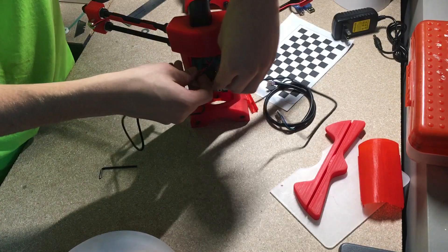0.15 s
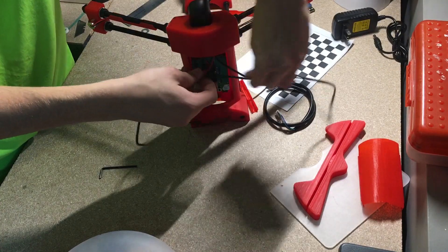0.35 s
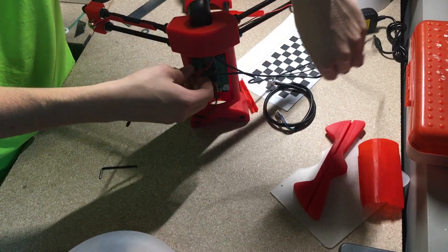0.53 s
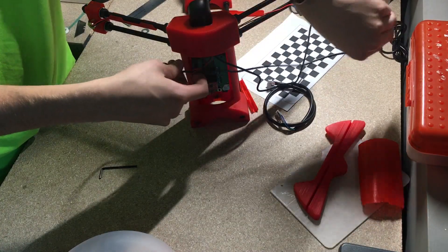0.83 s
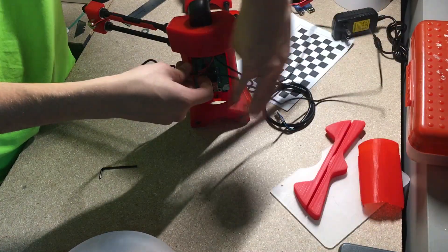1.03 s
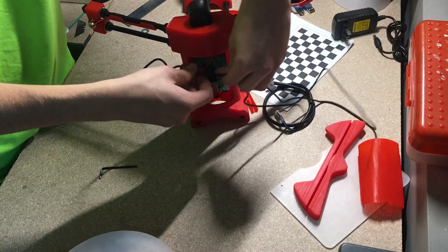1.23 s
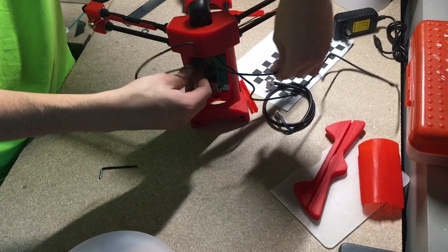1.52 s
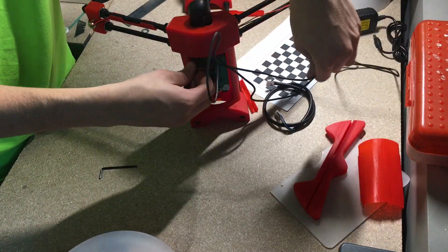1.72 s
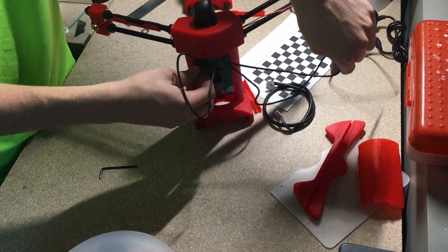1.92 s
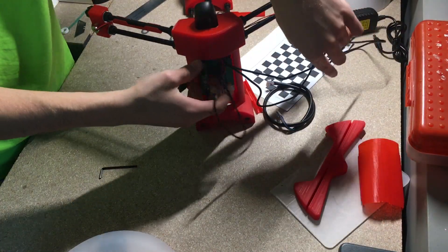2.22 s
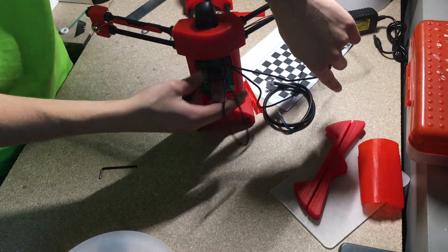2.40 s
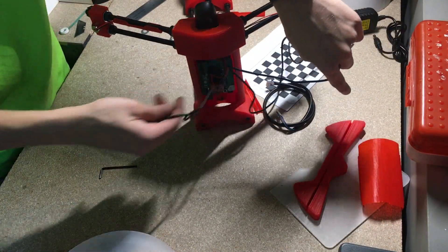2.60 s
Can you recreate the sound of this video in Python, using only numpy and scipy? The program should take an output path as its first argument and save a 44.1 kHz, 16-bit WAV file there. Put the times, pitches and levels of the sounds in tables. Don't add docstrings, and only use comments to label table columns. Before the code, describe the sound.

A thin cable is pulled through a hollow plastic base, close to the microphone in a small quiet room; early whip and slap, grainy hisses and taps, then booming judders and crowded clacks near the end.

```python
import sys
import numpy as np
from scipy import signal
from scipy.fft import rfft, irfft, next_fast_len
from scipy.io import wavfile
from scipy.ndimage import uniform_filter1d, map_coordinates

SR = 44100
rng = np.random.default_rng(int(sys.argv[2]) if len(sys.argv) > 2 else 0)


def inscribe(sig):
    pcm = np.round(np.clip(np.atleast_2d(sig).T, -1, 1) * 32767)
    wavfile.write(sys.argv[1], SR, pcm.astype(np.int16))


def to_linear_factor(level_db):
    exponent = np.asarray(level_db, float) / 20
    return 10 ** exponent


N = 121275


def unit(x):
    return x / np.sqrt(np.mean(x ** 2) + 1e-20)


def along(points, hz):
    f, v = np.transpose(points)
    return np.interp(np.log(hz + 1), np.log(f + 1), v)


def curves(rows, outside=None):
    s, *cols = np.transpose(rows)
    return [np.interp(np.arange(N) / SR, s, c, outside, outside) for c in cols]


def wobble(rate):
    knots = rng.standard_normal(int(N * rate / SR) + 4)
    return map_coordinates(knots, [np.arange(N) * rate / SR])


def filtered(x, response):
    m = next_fast_len(len(x) + SR // 2)
    return irfft(rfft(x, m) * response(np.fft.rfftfreq(m, 1 / SR)), m)[:len(x)]


def resonance(f, centre, width):
    return 1j * f * width / (centre ** 2 - f * f + 1j * f * width)


def resonances(table):
    def response(f):
        return sum((-1) ** k * to_linear_factor(db) * resonance(f, c, w) for k, (c, w, db) in enumerate(table))
    return response


def patchy(x, depth_db):
    z = signal.stft(x, nperseg=256)[2]
    field = uniform_filter1d(rng.standard_normal(z.shape), size=4, axis=0)
    field = uniform_filter1d(field, size=16, axis=1)
    return signal.istft(z * to_linear_factor(depth_db * unit(field)), nperseg=256)[1][:N]


# (frequency [Hz], decay time t60 [s])
ROOM_DECAY = [(150, 0.99), (1000, 0.54), (3000, 0.4), (8000, 0.4), (15000, 0.066)]


def room(x, length):
    hz, t, z = signal.stft(rng.standard_normal(SR // 2), SR, nperseg=256)
    decay = to_linear_factor(-60 * t / along(ROOM_DECAY, hz)[:, None])
    tail = signal.istft(z * decay, SR, nperseg=256)[1]
    delayed = np.pad(x, (200, 0))
    return signal.fftconvolve(delayed, tail / np.linalg.norm(tail))[:length]


# (frequency [Hz], density [dB per Hz])
FLOOR_SPECTRUM = [(20, -21), (60, -0.5), (105, -5.5), (150, -15), (300, -14.5), (700, -23.5), (4000, -31),
                  (16000, -38)]


def floor():
    noise = filtered(rng.standard_normal(N), lambda f: to_linear_factor(along(FLOOR_SPECTRUM, f)))
    return to_linear_factor(-44.5) * unit(noise)


# (frequency [Hz], bandwidth [Hz], level [dB])
DESK_MODES = [(57, 45.6, -6), (71.7, 9.7, -2.5), (143.9, 7.1, 0), (188.2, 17.2, 2.5), (223.3, 37, 1),
              (302.3, 34.5, -1.5), (349, 46, -7), (469.6, 34, -8), (628, 63, -13)]
# (time [s], level [dB])
DESK_LOAD = [(0.0, -50), (1.08, -43.5), (1.11, -26.5), (1.22, -39.5), (1.49, -36.5), (1.52, -53),
             (1.84, -40.5), (1.94, -25.5), (2.01, -24.5), (2.075, -18.5), (2.2, -27.5), (2.44, -37.5),
             (2.46, -34), (2.75, -44.5)]


def desk_boom():
    load_db, = curves(DESK_LOAD)
    tones = []
    for hz, spread in [(70.7, 0.04), (143.1, 0.03)]:
        tones.append(np.sin(2 * np.pi * np.cumsum(hz * (1 + spread * wobble(15))) / SR))
    sway, flex = tones
    low_modes = resonances(DESK_MODES[:2])
    rumble = unit(filtered(rng.standard_normal(N), lambda f: low_modes(f) * f ** 2 / (f ** 2 + 45 ** 2)))
    sway_gain = to_linear_factor(1.7 * wobble(25.5))
    flex_gain = to_linear_factor(-1.5 + 4.0 * wobble(12.09))
    return to_linear_factor(load_db - 2.0) * (to_linear_factor(-5.5) * rumble + sway_gain * sway + flex_gain * flex)


# (time [s], slip rate [Hz], level [dB])
JUDDERS = [
    [(1.6, 167.6, -55), (1.62, 160.6, -61), (1.644, 188.5, -37.5), (1.664, 197, -35), (1.7, 192, -37)],
    [(1.86, 165, -33.5), (1.962, 232.2, -24.5), (1.978, 230, -10.5), (2.003, 230, -8.5), (2.012, 240, -20)],
    [(2.013, 190.5, -27), (2.019, 192, -16), (2.087, 197.4, -15), (2.093, 201, -31), (2.16, 195, -36)],
    [(2.17, 196, -40), (2.2, 200.3, -19.5), (2.222, 200.6, -28.5), (2.238, 195, -13.5), (2.262, 192, -15.5),
     (2.302, 187, -26), (2.34, 198, -41)],
    [(2.4, 201.9, -68), (2.43, 210.5, -14.5), (2.452, 199, -30), (2.458, 198, -25.5), (2.52, 189, -40)],
]


def judder():
    jerks = np.zeros(N)
    for rows in JUDDERS:
        slip_hz = curves(rows)[0]
        db = curves(rows, outside=-100)[1]
        phase = 2 * np.pi * np.cumsum(slip_hz * (1 + 0.02 * wobble(120))) / SR
        level = uniform_filter1d(to_linear_factor(db + 1.2 * wobble(87)), size=200)
        jerks += 1.26 * level * (np.sin(phase) + 0.11 * np.sin(2 * phase + 1))
    return jerks


# (frequency [Hz], bandwidth [Hz], level [dB])
PLASTIC_MODES = [(686, 207, -3.5), (952, 344, 0), (1396, 185, 4), (1720, 510, 4), (2650, 1160, -3),
                 (3474, 640, -0.5), (3970, 280, -3), (5020, 670, -7.5), (6100, 2960, -5), (8750, 1540, -7),
                 (11200, 3300, -14.5), (13250, 2800, -50)]
# (frequency [Hz], density [dB per Hz])
SKIN_SPECTRUM = [(1500, -30), (3000, 0), (5500, 4), (9000, 6), (12000, 0.5), (16000, -1.5)]
# (start [s], end [s], skin on cable [dB], cable on plastic [dB], drag on desk [dB])
STROKES_OF_CABLE = [(0, 0.117, -73, -46, -43.5), (0.299, 0.422, -54, -55, -61),
                    (0.425, 0.46, -43.5, -46.5, -49), (0.462, 0.554, -40, -51, -52),
                    (1.064, 1.253, -56.5, -48.5, -44), (1.297, 1.415, -49, -40.5, -41),
                    (1.413, 1.494, -39, -35, -36), (1.517, 1.577, -54, -38.5, -52),
                    (1.593, 1.668, -42.5, -40.5, -54.5), (1.73, 1.886, -59, -55, -44.5),
                    (1.936, 2.036, -37, -31, -22.5), (2.028, 2.066, -54, -41, -30),
                    (2.095, 2.186, -53, -60, -53), (2.186, 2.211, -41.5, -36, -29.5),
                    (2.223, 2.28, -43.5, -45, -32), (2.391, 2.488, -45.5, -46, -39.5),
                    (2.695, 2.8, -49, -43.5, -34.5)]


def slide():
    grip_s, let_go_s = 0.0045, 0.0071
    t = np.arange(N) / SR
    start, end, *dbs = np.transpose(STROKES_OF_CABLE)[:, :, None]
    shape = np.clip((t - start) / grip_s, 0, 1) * np.exp(-np.maximum(t - end, 0) / let_go_s)
    skin_gain, scrape_gain, drag_gain = [np.sum(to_linear_factor(db) * shape, axis=0) for db in dbs]
    rough = patchy(rng.standard_normal(N) * to_linear_factor(3.2 * wobble(1500)), 3)
    skin = unit(filtered(rough, lambda f: to_linear_factor(along(SKIN_SPECTRUM, f))))
    grains = rng.standard_normal(N) * to_linear_factor(3.3 * wobble(900))
    scrape = unit(filtered(grains, resonances(PLASTIC_MODES[1:8])))
    lurches = rng.standard_normal(N) * to_linear_factor(6.0 * wobble(100))
    drag = unit(filtered(lurches, resonances(DESK_MODES[2:])))
    near = skin_gain * to_linear_factor(0.98 * wobble(39.2)) * skin
    near += scrape_gain * to_linear_factor(0.85 * wobble(30.27)) * scrape
    near += drag_gain * drag
    return near + to_linear_factor(-8.5) * room(near, N)


# (time [s], level [dB], pitch [Hz], decay time t60 [s])
PANEL_RINGS = [(0.038, -19, 904, 0.072), (0.038, -19, 463, 0.032), (0.111, -16.5, 730, 0.066),
               (0.111, -1.5, 6240, 0.028), (0.111, -25.5, 350, 0.097), (0.411, -32, 900, 0.35),
               (0.411, -30, 1456, .1), (0.476, -26, 10700, 0.038), (0.602, -23, 11000, 0.011),
               (0.553, -18, 900, 0.092), (0.685, -18, 5200, 0.042), (1.22, -32, 900, .05),
               (1.327, -23.5, 2170, .04), (1.501, -9.5, 6900, 0.034), (1.504, -12.5, 2180, 0.045),
               (1.889, -24, 5670, 0.053), (1.888, -20.5, 9200, 0.036), (2.111, -18.5, 956, 0.035),
               (2.197, -27, 3640, 0.06), (2.208, -29, 960, 0.09), (2.228, -10.5, 1540, 0.05),
               (2.238, -17, 994, 0.14), (2.238, -16.5, 610, .08), (2.355, -30.5, 800, 0.06),
               (2.412, -19.5, 3250, 0.023), (2.427, -21.5, 1030, 0.051), (2.415, -22, 459, 0.28),
               (2.455, -23, 1356, 0.14), (2.477, -18.5, 3220, 0.066), (2.633, -10.5, 3270, 0.024),
               (0.544, -19, 1430, .3), (0.556, -24, 777, 0.4), (0.544, -20, 1856, 0.14),
               (1.082, -25.5, 148, 0.46), (1.083, -19.5, 4310, 0.028), (1.945, -24, 461, 0.16),
               (1.944, -22, 1630, 0.039), (1.945, -22, 3120, 0.037), (1.995, -31, 3920, .04),
               (2.262, -21.5, 291, 0.16), (2.265, -23.5, 148, 0.35), (2.27, -21.5, 836, 0.086),
               (2.504, -17.5, 5280, 0.037), (2.634, -17.5, 1718, 0.14), (2.72, -28, 205, .2),
               (1.4, -26.5, 201, 0.18), (0.119, -26.5, 145.6, 0.28), (2.02, -15, 329, .15),
               (0.54, -4, 3750, 0.056)]


def panels():
    out, t = np.zeros(N + SR), np.arange(SR // 4) / SR
    for s, db, hz, t60 in PANEL_RINGS:
        apart = 0.5 + rng.random((3, 1))
        modes = hz * (1 + 0.0294 * np.array([[-1], [0], [1]]) * apart)
        tones = np.sum(to_linear_factor([[-5], [0], [-5]]) * np.sin(2 * np.pi * modes * t), axis=0)
        out[round(s * SR):][:len(t)] += to_linear_factor(db - 60 * t / t60) * tones / 2
    dull = filtered(out[:N], lambda f: 1 / (1 + (f / 2500) ** 2))
    return out[:N] + to_linear_factor(-16) * room(dull, N)


def hits(table, t60, gain_db, room_db, damped=1.13):
    rise_s, rattle_s = 0.00014, 0.0026
    out, push, t = np.zeros(N + SR), np.zeros(N), np.arange(4096) / SR
    f = np.fft.rfftfreq(len(t), 1 / SR)
    c, w, level = np.transpose(PLASTIC_MODES)[:, :, None]
    decay = to_linear_factor(-60 * np.maximum(t - rattle_s, 0) / t60 * (c / 3000) ** 0.93)
    shape = (1 - np.exp(-t / rise_s)) * decay
    for s, db, thump_db, body_db, edge_db in table:
        tuned = c * (1 + 0.0043 * rng.normal())
        response = resonance(f, tuned, damped * w) ** 2
        spikes_db = 4 * uniform_filter1d(rng.standard_normal(len(t)), size=12) * np.sqrt(12)
        force = shape * to_linear_factor(spikes_db) * rng.standard_normal(shape.shape)
        modes = irfft(rfft(force) * response)
        tilt = [(900, (thump_db + body_db) / 2 + 13), (1670, body_db + 13), (3330, 0), (8300, edge_db + 9)]
        gains = to_linear_factor(level + along(tilt, c) + rng.normal(0, 1, c.shape)) * np.sqrt(w)
        ring = np.sum(gains * modes / np.linalg.norm(modes, axis=1, keepdims=True), axis=0)
        power = np.abs(response) ** 2
        colour = np.sqrt(np.sum(gains ** 2 * power / np.sum(power, axis=1, keepdims=True), axis=0))
        click = np.roll(irfft(colour), shift=128)
        ring, click = [unit(m) * to_linear_factor(db + gain_db - 15) for m in (ring, click)]
        dull = filtered(click, lambda hz: 1 / (1 + 1j * hz / 7000))
        at = round(s * SR)
        out[at:][:len(t)] += ring
        out[at:][:SR // 2] += to_linear_factor(room_db) * room(dull, SR // 2)
        push[at + 40] = to_linear_factor(db + thump_db + 45.5)
    thump = filtered(push, resonances(DESK_MODES))
    return out[:N] + filtered(thump, lambda f: 1 / (1 + 1j * f / 900))


# (time [s], peak level [dB], desk thump [dB], hollow body [dB], bright edge [dB])
TAP_EVENTS = [(0.0374, -16, -7, -9.5, -17.5), (0.3321, -30.5, -17, -21, -16),
              (0.4101, -19.5, -16.5, -15.5, -11.5), (0.5251, -22.5, -15, -8, -1),
              (0.5537, -1.5, -17.5, -8.5, -16.5), (1.2199, -24.5, -7.5, -9, -36),
              (1.2955, -13, -12, -21, -30), (1.3246, -20, -32, -28, -31), (1.3518, -27, -12, -27, 5),
              (1.4797, -29, 2, -6, -2), (1.5621, -17.5, -26, 11, -30), (1.7559, -32, -6, -24, -1),
              (1.8407, -28.5, -13, -19, -12), (1.8743, -22, -20, -9, -9), (2.1075, -13, -7, -12, -25),
              (2.1983, -22, -10, -1, 0), (2.25, -13.5, 1.5, -6, -18), (2.2669, -15.5, -3, -8, -15),
              (2.4085, -6.5, -16, -3, -12), (2.4269, -10.5, -7.5, -10, -16), (2.4358, -12.5, -16, -5, -12),
              (2.4533, -21, -0.5, -3, -18)]


def taps():
    return hits(TAP_EVENTS, 0.048, -8.5, -6.5)


# (time [s], peak level [dB], desk thump [dB], hollow body [dB], bright edge [dB])
WHIP_EVENTS = [
    (0.1103, 1, -21, -23, -9),
]


def whip():
    return hits(WHIP_EVENTS, 0.043, -5.5, -5.5, damped=2.9)


# (time [s], peak level [dB], desk thump [dB], hollow body [dB], bright edge [dB])
SLAP_EVENTS = [(0.5387, 2.5, -28.5, -12, -13), (0.607, -13, -14.5, -19, -10),
               (0.6846, -8, -24.5, -16, -16.5), (1.081, -14, -5.5, -23.5, -12.5),
               (1.502, -2, -51, -22.5, -11), (1.8879, -15, -13, -7, 8.5), (1.9439, -12, -14, -3, -3),
               (2.2295, -3, -8, -19.5, -16), (2.476, -12.5, -15, -19, -18), (2.5038, -13.5, -13.5, -24, -3),
               (2.6317, -4, -24.5, -19.5, -19), (2.7414, -23, -20, -15, 1)]


def slaps():
    return hits(SLAP_EVENTS, 0.043, -5.5, -12)


def scene():
    contacts = taps() + whip() + slaps()
    return (floor() + desk_boom() + judder() + slide() + panels() + contacts)[None]


def top_cut(x):
    return signal.sosfilt(signal.butter(12, 16640, fs=SR, output="sos"), x)


def record(dry):
    overload = 0.92
    soft = dry[0] / (1 + np.abs(dry[0] / overload) ** 4) ** (1 / 4)
    mix = filtered(soft, lambda f: np.where(f < 15780, 1, to_linear_factor(-32)))
    return top_cut(mix[None])


dry = scene()
out = record(dry)
inscribe(out)
```